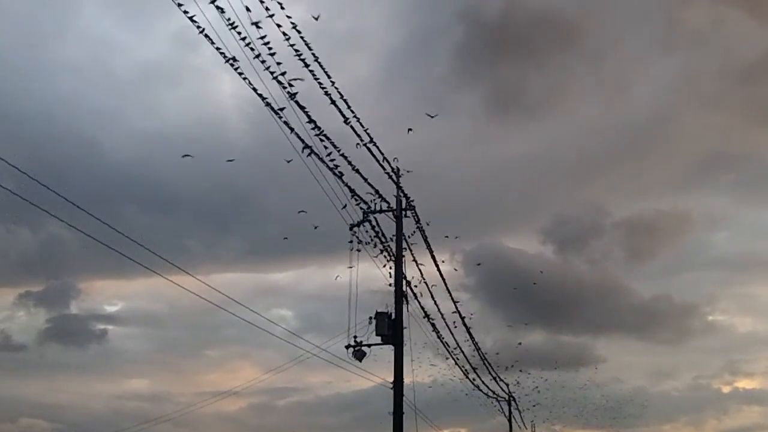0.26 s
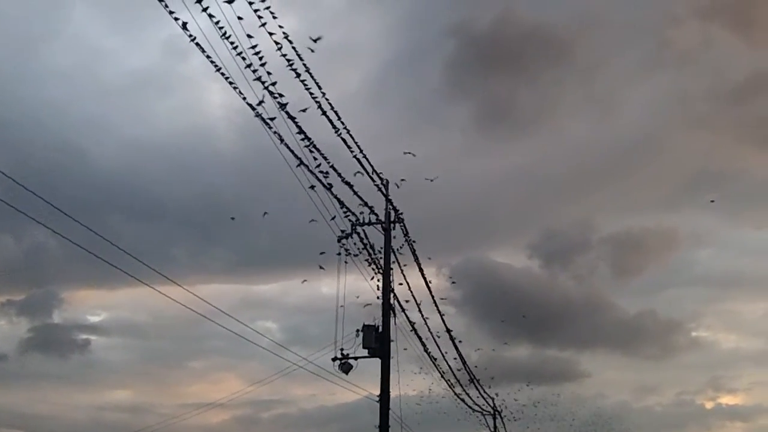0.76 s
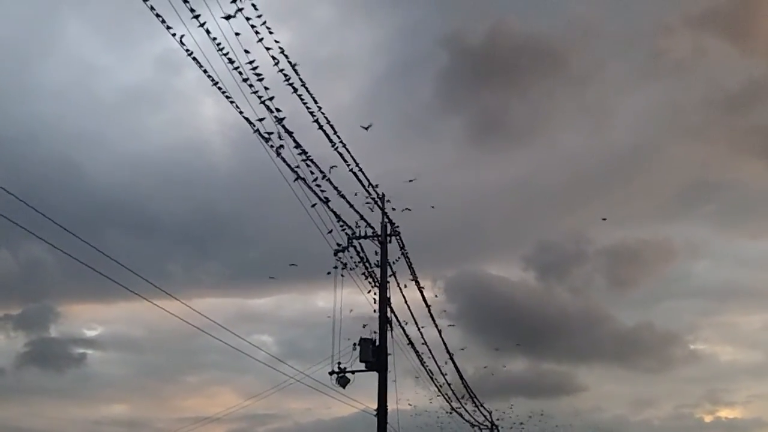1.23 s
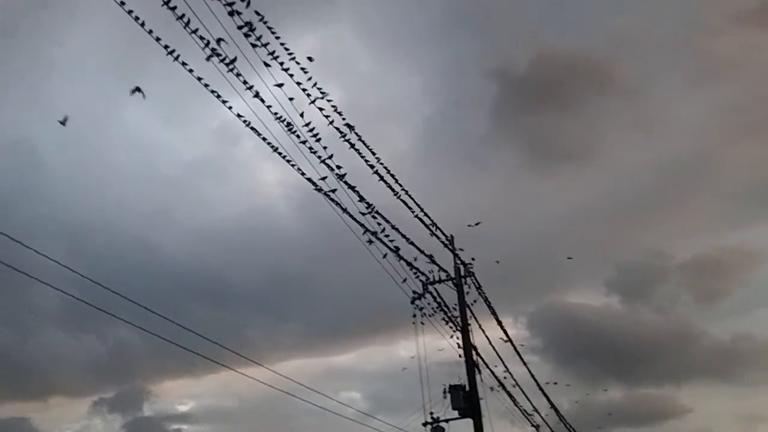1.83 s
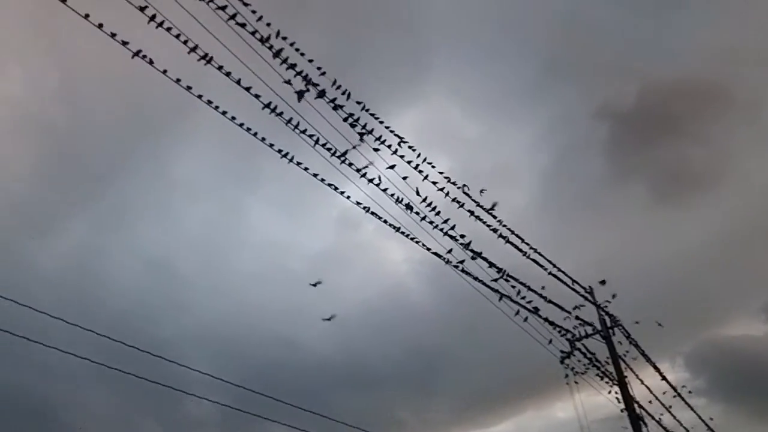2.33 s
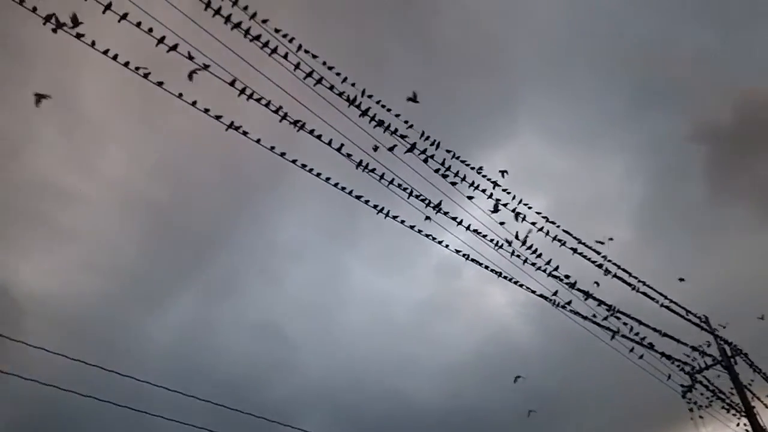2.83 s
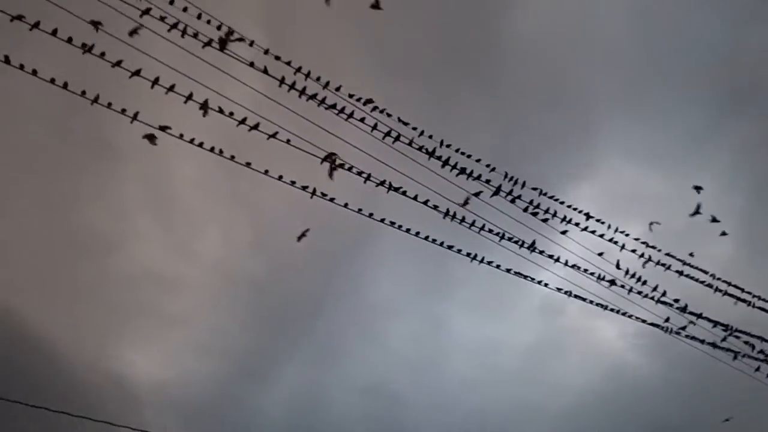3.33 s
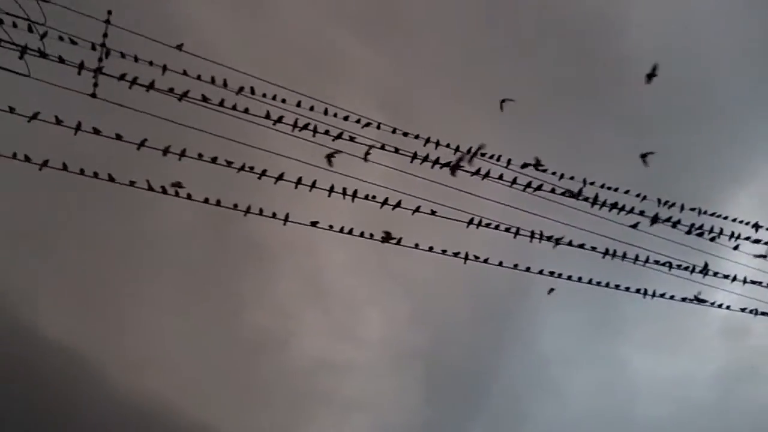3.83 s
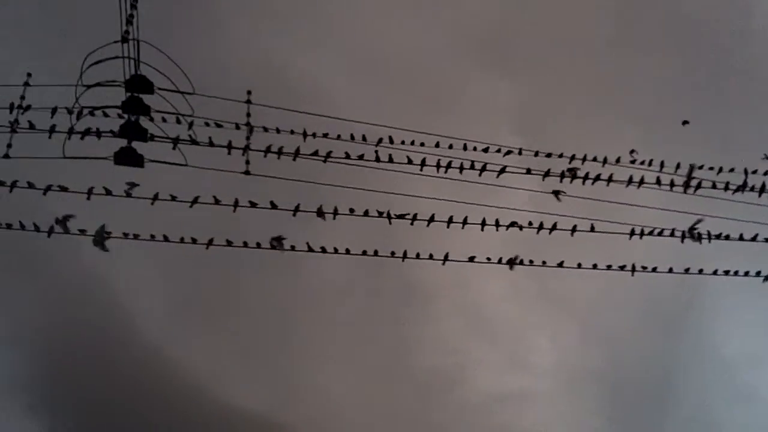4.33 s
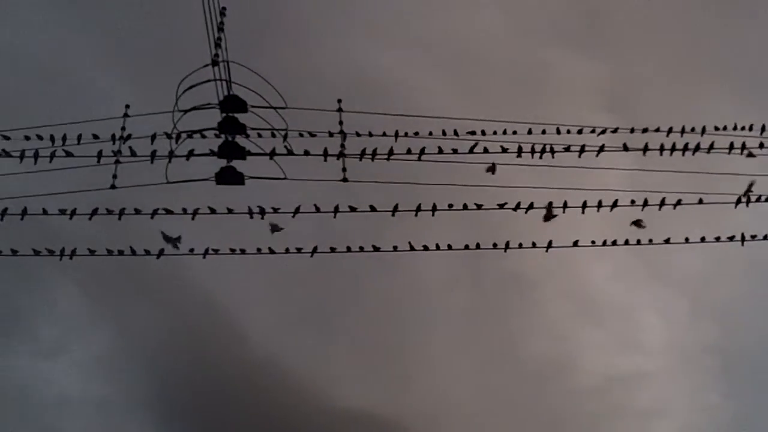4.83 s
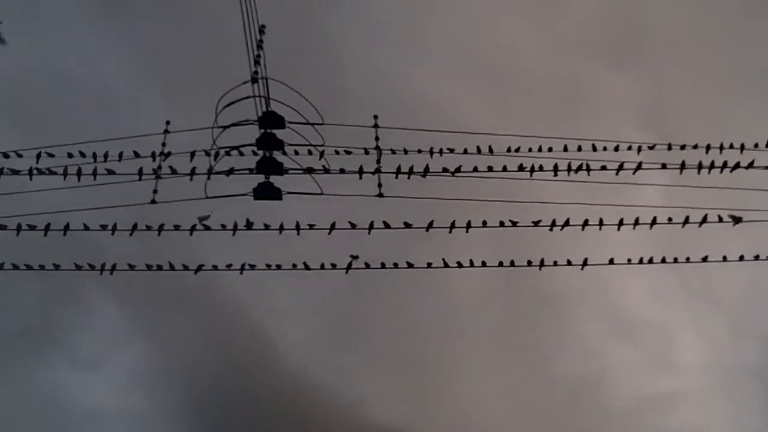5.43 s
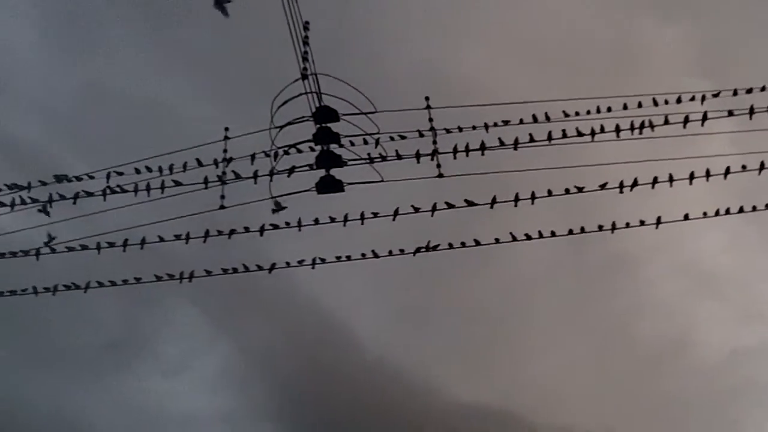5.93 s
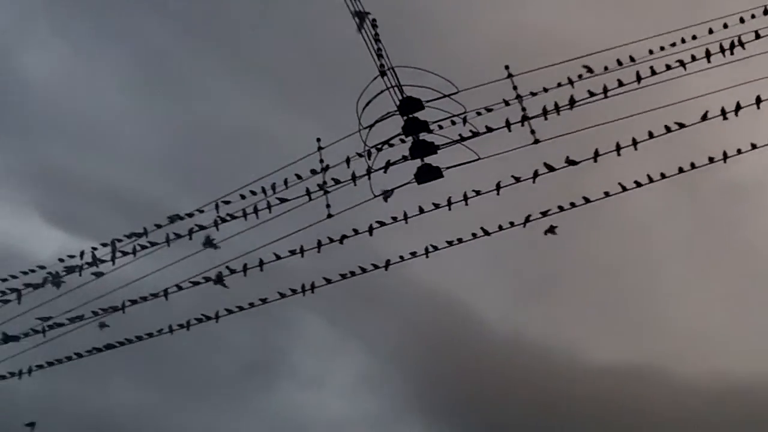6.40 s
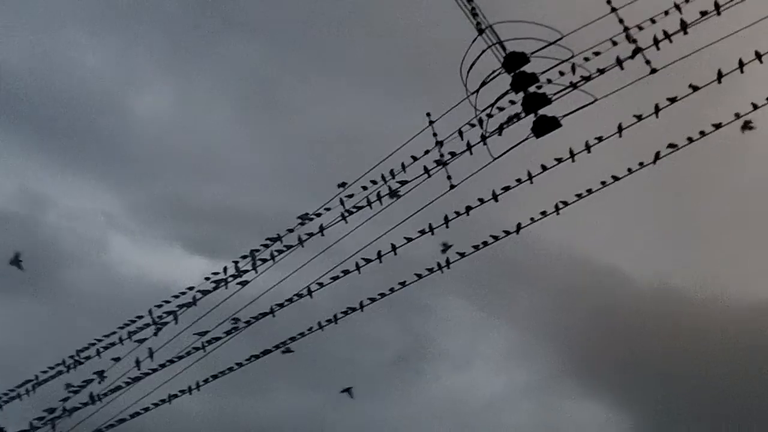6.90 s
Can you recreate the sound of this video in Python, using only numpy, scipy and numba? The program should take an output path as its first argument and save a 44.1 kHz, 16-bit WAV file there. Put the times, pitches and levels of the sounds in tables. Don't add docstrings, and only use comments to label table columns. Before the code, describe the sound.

A steady wall of high, harsh bird chatter fills the whole stretch, full from the first instant, flickering with brief squabbles but barely changing in level. Single rising and falling calls poke out around the middle and near the end. Low down lie a weak motor hum that fades, smooth far traffic, and light wind thumping the handheld microphone. The treble is slightly grainy; no echo.

```python
import sys
import numpy as np
from scipy import signal
from scipy.fft import rfft, irfft
from scipy.io import wavfile
from scipy.ndimage import uniform_filter1d
from numba import njit

SR = 44100
rng = np.random.default_rng(int(sys.argv[2]) if len(sys.argv) > 2 else 0)


def materialize(psi):
    bounded = np.clip(np.atleast_2d(psi).T, -1, 1)
    quanta = np.round(bounded * 32767).astype(np.int16)
    wavfile.write(sys.argv[1], SR, quanta)


def level_to_linear(level):
    exponent = np.asarray(level, float) / 20
    return 10 ** exponent


N = 315756
HZ = np.fft.rfftfreq(N, 1 / SR)

# frequency in Hz, level in dB per Hz.
FLOCK_COLOUR = [(530, -71), (900, -33.5), (1440, -20.5), (2570, -4.5), (3850, 1), (4360, -1.5), (5880, -13),
                (6840, -22.5), (7400, -32), (9620, -52), (16300, -120)]
# frequency in Hz, level in dB per Hz.
RASP_COLOUR = [(7000, -5.5), (8300, -3), (8670, 0), (9020, 1.5), (9400, -2.5), (9970, -9.5), (10400, -8),
               (11300, -7), (12400, -5.5), (13300, -13), (14250, -19)]
# start in seconds, length in seconds, start pitch in Hz,
# end pitch in Hz, level in dB.
SOLOS = [
    (0.083, 0.068, 6200, 6600, -34),
    (0.603, .1, 8900, 8700, -55),
    (3.08, .12, 8300, 8000, -51),
    (3.6, 0.61, 3830, 4050, -31),
    (4.348, 0.19, 5550, 5350, -33),
    (4.39, .1, 5300, 5530, -36),
    (4.442, 0.1, 3750, 3920, -28),
    (5.902, .12, 4000, 4200, -29),
    (6.15, .2, 4300, 4900, -30.5),
    (6.3, .1, 3900, 4100, -30),
]
# time in seconds, share from 0 to 1.
OVERHEAD = [(0, 0.4), (1.2, 0), (2.2, 0.53), (3.0, 1), (4.1, 1), (4.6, 0.2), (5.3, 0.26), (7.16, 0.16)]
# middle in seconds, length in
# seconds, shrillness in dB, rasp in dB.
SQUABBLES = [(.13, .12, -1, 2), (.29, .12, 1.5, 3.5), (.63, .16, 0, 3.5), (.88, .16, 0, 2),
             (1.17, 0.23, 1.5, 0.5), (1.96, .14, 2.5, 2.5), (3.13, .2, 3, 3), (3.35, 0.43, 1.5, 1.5),
             (3.72, .16, 4, 1), (3.84, .1, 0, -2.5), (5.33, .12, 2.5, 0), (5.62, .3, 1.5, 2),
             (6.25, .2, 2, 0), (6.53, 0.12, 1.5, 1)]
# middle in seconds, length in seconds, change in dB.
LULLS = [(.27, 0.19, -0.5), (2.9, 0.13, -.8), (4.63, 0.36, -0.9), (5.24, 0.1, -1), (6.66, 0.061, -2)]
# time in seconds, pitch of its second tone in Hz,
# level of that tone in dB.
MOTOR_PATH = [
    (0, 120, -42),
    (.7, 117.7, -41.5),
    (1.3, 117.7, -43.5),
    (2.4, 115.3, -47.5),
    (4.25, 115.1, -47.5),
    (4.55, 117.6, -48.5),
    (7.16, 117.6, -50),
]
# multiple of the turn rate, level in dB.
MOTOR_ORDERS = [(1, -6), (2, -3), (3, -14.5), (1.73, -14), (2.499, -21), (4, -29)]
# frequency in Hz, level in dB per Hz.
TRAFFIC_COLOUR = [(15, -31), (25, -4), (44, -2), (120, -4.5), (139, -5), (162, -9.5), (205, -11.5),
                  (292, -4), (409, -16.5), (518, -13), (667, -17), (1030, -12.5), (1200, -15.5),
                  (1400, -30), (1820, -48), (3080, -120)]
# middle in seconds, length in seconds, middle pitch in Hz, glide in Hz, peak in dB.
WHINE = [
    (6.07, 0.34, 790, 25, -63),
    (6.45, .7, 787, -16, -64),
    (6.756, .35, 787, -40, -59.5),
    (7.07, .22, 780, 15.5, -60),
]
# start in seconds, peak in dB, pitch in Hz, time to fall by 60 dB in seconds.
KNOCK = (6.4722, -38, 570, .03)
# middle in seconds, length in seconds, rise in dB.
GUSTS = [(.17, .3, 10), (.42, 0.35, 16), (.68, .2, 13), (.95, .2, 1), (1.2, .2, 5), (1.42, .16, 2),
         (1.62, .18, 16), (2.0, .3, 7), (2.2, 0.28, 13), (2.9, .7, 1), (3.85, .5, -7), (4.2, .25, 4),
         (4.4, .14, 16), (4.58, 0.38, 12), (6.11, 0.12, 7)]
# time in seconds, peak in dB, pitch in Hz.
BUMPS = [
    (.24, -37, 130),
    (.40, -36, 80),
    (1.60, -41, 90),
    (1.962, -33, 135),
    (2.04, -36, 60),
    (4.40, -38, 110),
    (4.50, -42, 110),
    (6.10, -43, 50),
]
# time in seconds, peak in dB.
TICK = (1.577, -23)
# middle in Hz, width in Hz, depth in dB.
TREBLE_GAPS = [(7860, 215, -28), (9700, 65, -6), (10650, 200, -4.5), (11845, 95, -26)]
# frequency in Hz, limit in dB.
TREBLE_LIMIT = [(6500, -14), (7200, 0), (7600, 3), (8900, -3.5), (10300, 1.5), (11300, -1.5), (12600, -1.5),
                (13500, 4.5), (14200, 7)]

DIN_DB = -23.5
SURGE_DB, SURGE_PER_S = .2, 4
RING_OVERHEAD_DB, SHRILL_OVERHEAD_DB = 1, -2.5
LOW_OVERHEAD_DB = -0.7
RING_WANDER_DB, SHRILL_WANDER_DB, RASP_WANDER_DB = .7, .8, .2
RASP_DB, RASP_FADE_DB_PER_S = -32, 0.06
TRAFFIC_DB, TRAFFIC_FOLLOWS = -49.5, 0.3
BREEZE_DB, BREEZE_WANDER_DB = -58.5, 2.5
LIMIT_WOBBLE_DB = 3
EDGE_S = .001


def rms_one(x):
    return x / np.sqrt(np.mean(x ** 2) + 1e-20)


def in_time(rows):
    s, *columns = np.transpose(rows)
    return [np.interp(np.arange(N) / SR, s, c) for c in columns]


def coloured(x, spectrum):
    bins = rfft(x)
    hz, level_db = np.transpose(spectrum)
    mean = np.sqrt(uniform_filter1d(np.abs(bins) ** 2, size=1500))
    gain = level_to_linear(np.interp(np.log(HZ + 1), np.log(hz), level_db, left=-120, right=-120))
    return rms_one(irfft(bins / mean * gain, N))


def band(x, low_hz, high_hz):
    return signal.sosfilt(signal.butter(2, [low_hz, high_hz], "band", fs=SR, output="sos"), x)


def drift(rate):
    r = np.exp(-80 * np.pi * rate / SR)
    slow = signal.lfilter([1], [1, -2 * r, r * r], rng.standard_normal(N // 40 + 2002))[2000:]
    return np.interp(np.arange(N) / 40, np.arange(len(slow)), rms_one(slow))


def swells(rows, column):
    t = np.arange(N) / SR
    return sum(row[column] * np.cos(np.pi * np.clip((t - row[0]) / row[1], -.5, .5)) ** 2 for row in rows)


def flock():
    overhead, = in_time(OVERHEAD)
    churrs = calls(count=5000, spread_db=0.8, low_hz=1100.6, high_hz=6491,
                   length_s=.045, glide=.3, buzz_hz=70.14, rough=.3)
    chips = calls(count=8000, spread_db=2.2, low_hz=1501.4, high_hz=6494,
                  length_s=.011, glide=.6, buzz_hz=200.3, rough=.15)
    clacks = calls(count=2500, spread_db=3.0, low_hz=2500, high_hz=5005,
                   length_s=.0012, glide=.3, buzz_hz=300, rough=.1)
    whistles = calls(count=1800, spread_db=0.0, low_hz=2301, high_hz=5940,
                     length_s=.04, glide=.2, buzz_hz=39.4, rough=.05)
    voices = churrs + level_to_linear(0.5) * chips + level_to_linear(-6) * clacks + level_to_linear(-11) * whistles
    voices = coloured(voices, [(500, 0), (15000, 0)])
    far = rng.standard_normal((2, N))
    din = coloured(voices + level_to_linear(-1.0) * far[0], FLOCK_COLOUR)

    tilt = overhead - .5
    shrill_db = SHRILL_OVERHEAD_DB * tilt + swells(SQUABBLES, column=2) + SHRILL_WANDER_DB * drift(4.9)
    ring_db = RING_OVERHEAD_DB * tilt + RING_WANDER_DB * drift(7)
    rasp_db = RASP_DB - RASP_FADE_DB_PER_S * np.arange(N) / SR
    rasp_db = rasp_db + swells(SQUABBLES, column=3) + RASP_WANDER_DB * drift(5.5)

    din = din + (level_to_linear(shrill_db) - 1) * band(din, 4880, 6700)
    din = din + (level_to_linear(ring_db) - 1) * band(din, 3680, 4270)
    din = din + (level_to_linear(LOW_OVERHEAD_DB * tilt) - 1) * band(din, 2500, 3400)
    rasp = coloured(voices + level_to_linear(-5.0) * far[1], RASP_COLOUR)
    level_db = DIN_DB + swells(LULLS, column=2) + SURGE_DB * drift(SURGE_PER_S)
    return level_to_linear(level_db) * (din + level_to_linear(rasp_db) * rasp)


def calls(count, spread_db, low_hz, high_hz, length_s, glide, buzz_hz, rough):
    start, length, nearness, pitch, turn, buzz, depth, hoarse = rng.random((count, 8)).T
    starts = ((start * 1.04 - .04) * N).astype(np.int64)
    lengths = (length_s * (.4 + 1.2 * length) * SR).astype(np.int64)
    gains = level_to_linear(-spread_db * np.log(1 - .98 * nearness))
    pitches = low_hz * (high_hz / low_hz) ** pitch / SR
    glides = glide * (2 * turn - 1)
    buzzes = buzz_hz * 2 ** (2 * buzz - 1) / SR
    breath = rms_one(band(rng.standard_normal(SR), 40, 900))
    out = np.zeros(N)
    add_calls(out, starts, lengths, gains, pitches, glides, buzzes, depth ** .5, breath, rough * hoarse)
    return rms_one(out)


@njit
def add_calls(out, starts, lengths, gains, pitches, glides, buzzes, depths, breath, rough):
    for c in range(len(starts)):
        phase, n = 0., lengths[c]
        for i in range(max(0, -starts[c]), min(n, len(out) - starts[c])):
            u = i / n
            shake = 1 + rough[c] * breath[(c * 977 + i) % len(breath)]
            phase += pitches[c] * (1 + glides[c] * (u - .5)) * shake
            chop = 1 - depths[c] * (i * buzzes[c] % 1)
            saw = phase % 1
            tone = 1 - 2 * saw * saw * (3 - 2 * saw) + .6 * saw * (1 - saw) - .1
            out[starts[c] + i] += gains[c] * np.sin(np.pi * u) * chop * chop * tone


def solos():
    out, t = np.zeros(N), np.arange(N) / SR
    for s, length_s, start_hz, end_hz, db in SOLOS:
        u = np.clip((t - s) / length_s, 0, 1)
        hz = (start_hz + (end_hz - start_hz) * u) * (1 + .02 * drift(29.4))
        tone = np.sin(2 * np.pi * np.cumsum(hz) / SR)
        out += level_to_linear(db) * np.sin(np.pi * u) * drift(90) * tone
    return out


def motor():
    second_hz, level_db = in_time(MOTOR_PATH)
    turns = np.cumsum(second_hz / 2 * (1 + 0.002 * drift(4.4))) / SR
    out = np.zeros(N)
    for multiple, db in MOTOR_ORDERS:
        strength = level_to_linear(level_db + db + 0.76 * drift(3.0))
        out += strength * np.sin(2 * np.pi * (multiple * turns + rng.random()))
    return np.sqrt(2) * out


def street():
    motor_db = in_time(MOTOR_PATH)[1]
    rumble_db = TRAFFIC_DB + TRAFFIC_FOLLOWS * (motor_db - motor_db.mean()) + 1.07 * drift(7.4)
    out = level_to_linear(rumble_db) * coloured(rng.standard_normal(N), TRAFFIC_COLOUR)
    t = np.arange(N) / SR
    for s, length_s, hz, glide_hz, db in WHINE:
        u = np.clip((t - s) / length_s, -.5, .5)
        pitch = (hz + glide_hz * u) * (1 + 0.0077 * drift(15.6))
        swell = level_to_linear(db + 3 + 1.5 * drift(12)) * np.cos(np.pi * u) ** 2
        out += swell * np.sin(2 * np.pi * np.cumsum(pitch) / SR)
    knock_s, peak_db, knock_hz, fall_s = KNOCK
    since = np.maximum(t - knock_s, 0)
    fading = level_to_linear(peak_db - 60 * np.minimum(since / fall_s, 4))
    return out + fading * np.sin(2 * np.pi * knock_hz * since)


def wind():
    gust_db = BREEZE_DB + swells(GUSTS, column=2) + BREEZE_WANDER_DB * drift(2.4)
    out = level_to_linear(gust_db) * rms_one(band(band(rng.standard_normal(N), 8.5, 54), 6.7, 60))
    t = np.arange(N) / SR
    for s, peak_db, hz in BUMPS:
        u = (t - s) * hz * 2 * np.pi
        out -= level_to_linear(peak_db) * 1.9 * u * np.exp(-u ** 2 / 2)
    return out


def tick():
    click = np.zeros(N)
    click[round(TICK[0] * SR)] = level_to_linear(TICK[1])
    return band(click, 4000, 13000)


def gated(x):
    hz, s, cells = signal.stft(x, SR, nperseg=2048)
    power = np.abs(cells) ** 2
    usual = uniform_filter1d(power.mean(axis=-1), size=25)[..., None]
    wobble = uniform_filter1d(rng.standard_normal((129, len(s))), 2)
    wobble = np.repeat(wobble, 8, axis=0)[:len(hz)]
    limit_db = np.interp(hz, *np.transpose(TREBLE_LIMIT), left=-200)[:, None] + LIMIT_WOBBLE_DB * wobble
    kept = uniform_filter1d(power, size=2, axis=-2) > usual * level_to_linear(2 * limit_db)
    return signal.istft(cells * kept, SR, nperseg=2048)[1][..., :N]


def scene():
    return (flock() + motor() + street() + wind() + solos())[None]


def band_limit(x):
    return signal.sosfilt(signal.butter(12, 15900, fs=SR, output="sos"), x)


def record(dry):
    t = np.arange(N) / SR
    dry = dry * np.clip(np.minimum(t, t[-1] - t) / EDGE_S, 0, 1)
    gaps_db = sum(db * np.exp(-((HZ - hz) / width_hz) ** 2) for hz, width_hz, db in TREBLE_GAPS)
    response = level_to_linear(gaps_db) * (HZ < 14250)
    heard = gated(irfft(rfft(dry) * response, N)) + tick()
    return band_limit(heard)


dry = scene()
out = record(dry)
materialize(out)
```